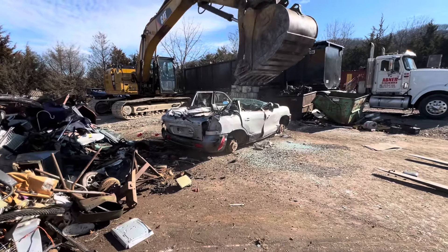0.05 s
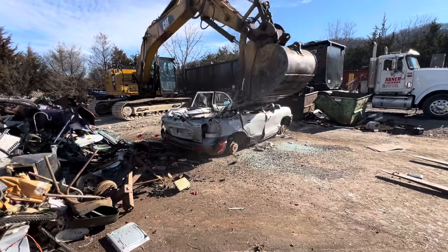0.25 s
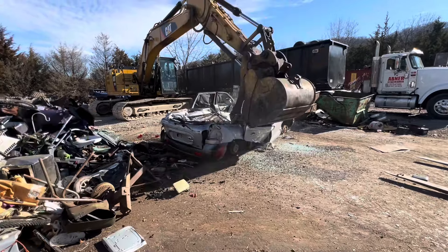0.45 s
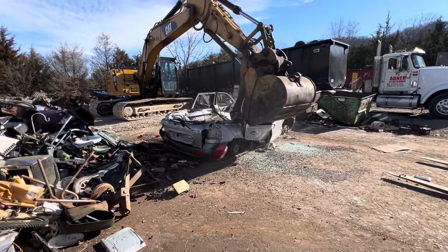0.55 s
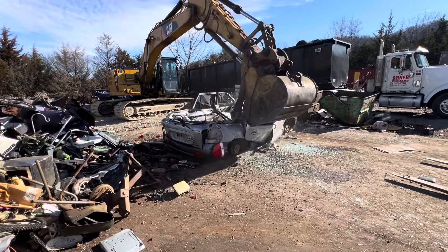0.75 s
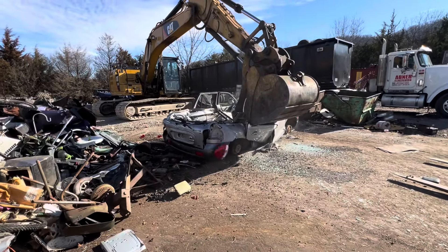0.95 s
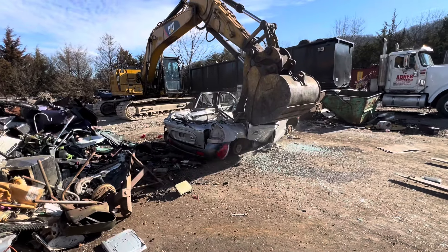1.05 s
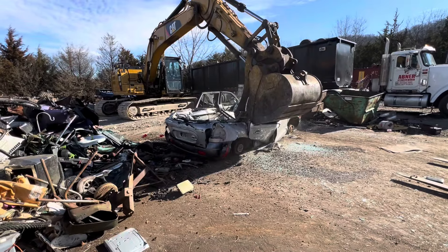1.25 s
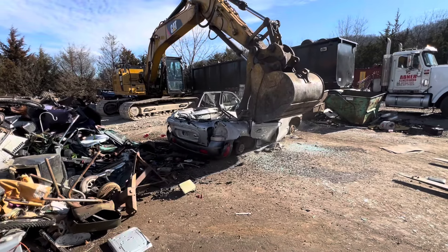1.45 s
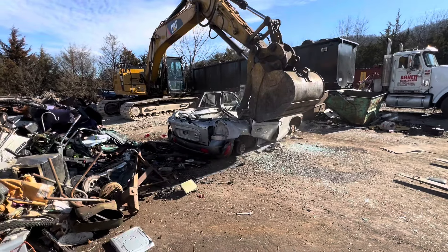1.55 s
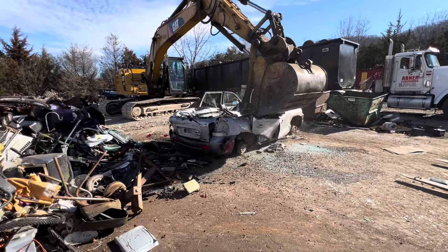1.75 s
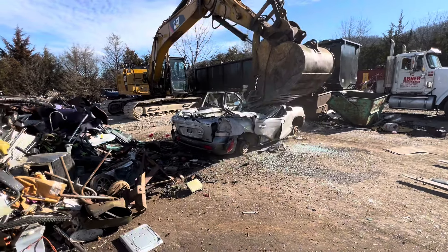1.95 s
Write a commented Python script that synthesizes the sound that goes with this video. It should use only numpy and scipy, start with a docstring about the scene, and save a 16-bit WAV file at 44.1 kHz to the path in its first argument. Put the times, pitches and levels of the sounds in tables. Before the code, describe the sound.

A car crunching under an excavator bucket, with clanks and shattering glass over diesel rumble.

```python
"""Excavator flattening a car

A bucket slams onto a wreck in a scrapyard and presses it flat. Sheet steel buckles in a storm of small
snaps, the shell booms, glass shatters and a strained panel squeals; then single clanks and a last thump
as the load shifts. The diesel and its hydraulic pump run throughout."""
import sys
import numpy as np
from scipy import signal
from scipy.fft import rfft, irfft
from scipy.io import wavfile
from scipy.ndimage import uniform_filter1d

SR = 44100
rng = np.random.default_rng(int(sys.argv[2]) if len(sys.argv) > 2 else 0)


def master_out(mix):
    """Clip the mix to full scale and print it as 16-bit PCM to the path in sys.argv[1]."""
    frames = np.transpose(np.atleast_2d(mix))
    ceiling = np.clip(frames, -1, 1)
    pcm = np.round(ceiling * 32767).astype(np.int16)
    wavfile.write(sys.argv[1], SR, pcm)


N = 88200
T = np.arange(N) / SR


def undb(db):
    """Decibels to gain."""
    return 10 ** (np.asarray(db) / 20)


def unit(x):
    """Scale to rms 1."""
    return x / np.sqrt(np.mean(x ** 2))


def curve(rows, lag_s=0):
    """Automation: straight lines through (time, value) rows."""
    return np.interp(T - lag_s, *np.array(rows).T)


def on_bins(hz, values):
    """Straight lines on a log-frequency axis, for every bin of a padded spectrum."""
    return np.interp(np.log(np.arange(N + 1) * SR / (2 * N) + 1), np.log(hz), values)


def colour(x, eq):
    """Minimum-phase EQ through (Hz, dB) rows."""
    cepstrum = irfft(on_bins(*np.array(eq).T) * np.log(10) / 20)
    cepstrum[1:N] *= 2
    cepstrum[N + 1:] = 0
    return irfft(rfft(x, 2 * N) * np.exp(rfft(cepstrum)))[:N]


def wander(rate_hz):
    """Smooth random modulation at rms 1."""
    hold = int(SR / rate_hz)
    steps = np.repeat(rng.standard_normal(N // hold + 1), hold)
    return unit(uniform_filter1d(uniform_filter1d(steps, hold), hold)[:N])


def strike(start, attack_s, t60_s):
    """Envelope with a quick rise and an exponential fall."""
    age = np.maximum(T - start, 0)
    return (1 - np.exp(-age / attack_s)) * np.exp(-np.minimum(np.log(1000) * age / t60_s, 20))


def ring(modes):
    """One second of fading partials."""
    t = T[:N // 2]
    return sum(undb(db - 60 * t / t60) * np.sin(2 * np.pi * hz * t) for hz, db, t60 in modes)


def clicks(per_s, spread_db):
    """Random clicks, many small and a few large."""
    size = undb(spread_db * np.minimum(rng.exponential(size=N), 5))
    return unit((rng.random(N) < per_s / SR) * size * rng.choice([-1, 1], N))


# Steel-on-steel hits: t/s, clank level/dB, crack level/dB, splinter level/dB
HITS = [(0.212, -51, -20, -28), (.217, -13, -9, -16.5), (.230, -32, -8.5, -17), (.292, -38, -17, -37),
        (.305, -14.5, -41, -43), (.333, -7.5, -36, -35), (.359, -16.5, -7, -31), (.399, -27, -13, -29),
        (.412, -11, -12.5, -30), (.796, -23, -17.5, -20), (.812, -23, -17, -41), (.839, -16, -12.5, -21),
        (.971, -33, -36, -33), (1.039, -54, -31.5, -31), (1.127, -47, -42, -35), (1.277, -11.5, -20, -34.5),
        (1.368, -15.5, -20.5, -25), (1.414, -25.5, -19.5, -30), (1.454, -16, -27, -34),
        (1.619, -28, -43, -57), (1.701, -16.5, -29.5, -41), (1.875, -49, -36.5, -41),
        (1.911, -29, -29, -30)]
# The ring of a clank: f/Hz, level/dB, t60/s
STEEL_MODES = [(243, -12.5, 0.2), (475, -7, 0.086), (597, -0.5, 0.06), (684, -6.5, 0.055),
               (879.6, -10, 0.08), (1134, -25, 0.083), (1314, -22, 0.12)]


def clanks():
    """Each hit rings the steel with its own tuning and balance of modes."""
    detune, scatter_db = 0.018, 2.5
    out = np.zeros(N)
    for start, clank_db, _, _ in HITS:
        pitch_draws, level_draws = rng.standard_normal((2, len(STEEL_MODES)))
        modes = [(hz * (1 + detune * pitch), db + scatter_db * level, t60)
                 for (hz, db, t60), pitch, level in zip(STEEL_MODES, pitch_draws, level_draws)]
        out += undb(clank_db) * np.interp(T - start, T[:N // 2], ring(modes), left=0, right=0)
    return out


# Midrange bite of cracking sheet: f/Hz, level/dB
CRACK_EQ = [(300, 3), (700, 0), (1500, -1.5), (3000, -4.5), (4500, -15), (8000, -36.5), (16000, -49.5)]
# Sparkle of splinters and glass: f/Hz, level/dB
SHARD_EQ = [(900, -33), (2000, 0), (3300, -0.5), (5000, -4), (8300, -3.5), (10000, -18.5), (12500, -13.5),
            (15500, -18.5)]


def cracks():
    """Each hit cracks the sheet and throws splinters of glass and plastic."""
    crack = unit(colour(clicks(per_s=14000, spread_db=2.5), CRACK_EQ))
    splinters = unit(colour(clicks(per_s=14000, spread_db=2.5), SHARD_EQ))
    attack_s = 0.00091
    out = np.zeros(N)
    for start, _, crack_db, splinter_db in HITS:
        out += undb(crack_db) * crack * strike(start, attack_s, t60_s=0.069)
        out += undb(splinter_db) * splinters * strike(start, attack_s, t60_s=0.045)
    return out


# Low-end punches of the flexing shell: t/s, start f/Hz, end f/Hz, t60/s, level/dB
SHELL_THUMPS = [(.217, 200, 89, 0.07, -0.5), (0.344, 79, 47, .3, -13), (0.403, 93, 45, 0.23, -9),
                (1.189, 197, 119, 0.043, -9.5), (1.703, 126, 50.7, .19, -12)]


def thumps():
    """The shell gives way with a low note that falls."""
    glide_s = 0.034
    out = np.zeros(N)
    for start, start_hz, end_hz, t60, db in SHELL_THUMPS:
        glide = np.exp(-np.maximum(T - start, 0) / glide_s)
        hz = (T > start) * (end_hz + (start_hz - end_hz) * glide)
        envelope = strike(start, attack_s=0.003, t60_s=t60)
        out += undb(db) * envelope * np.sin(2 * np.pi * np.cumsum(hz) / SR)
    return out


# Fader ride of the buckling steel: t/s, level/dB
CRUSH_RIDE = [(.208, -49), (.222, -26.5), (.29, -20), (.32, -11), (.37, -14.5), (.43, -16), (.48, -23.5),
              (.56, -31.5), (.67, -32), (.76, -25), (.84, -25.5), (.90, -43), (1.09, -44.5), (1.18, -36.5),
              (1.45, -39.5), (1.54, -49.5), (1.72, -32), (1.82, -56)]
# Boxy tone of the snaps: f/Hz, level/dB
SHEET_EQ = [(120, -16.5), (250, 3.5), (330, 0), (480, -2), (650, 2), (1000, -5), (1400, -10.5),
            (2800, -14.5), (4500, -24.5), (9000, -39)]
# Long rings of the panels: f/Hz, level/dB, t60/s
PANEL_RINGS = [(479, -1, 0.22), (610, -1.5, 0.34), (805, -1, 0.18), (970, 6.5, 0.26), (1240, -2, 0.15),
               (1650, 0, 0.22), (1804, -7, 0.14)]


def buckling():
    """Sheet steel folds in dense snaps, with the panels ringing 8 dB under them."""
    per_s, spread_db = 1400, 3.5
    crush = undb(curve(CRUSH_RIDE))
    snaps = unit(colour(clicks(per_s, spread_db), SHEET_EQ)) * crush
    panels = signal.fftconvolve(clicks(per_s, spread_db) * crush, ring(PANEL_RINGS))[:N]
    return snaps + undb(-8) * snaps.std() * unit(panels)


# Hollow resonances of the car's shell: f/Hz, width/Hz, level/dB
SHELL_BANDS = [(48.6, 11, -7.5), (90.4, 24.5, 2.5), (162.6, 63, -0.5), (223.3, 36, -7)]


def shell_boom():
    """The hollow shell booms, swelling just behind the buckling."""
    push = clicks(per_s=500, spread_db=1.3)
    boom = np.zeros(N)
    for hz, width, db in SHELL_BANDS:
        band = signal.butter(2, [hz - width / 2, hz + width / 2], "band", fs=SR, output="sos")
        boom += undb(db) * signal.sosfilt(band, push)
    return unit(boom) * undb(-2.5 + 0.9 * curve(CRUSH_RIDE, lag_s=0.021))


# Fader ride of breaking and falling glass: t/s, level/dB
GLASS_RIDE = [(.208, -72), (.222, -46), (.28, -32), (.36, -21), (.42, -22), (.54, -36.5), (.68, -37),
              (.73, -31), (.77, -38), (.83, -25), (.89, -42), (1.06, -50), (1.14, -40.5), (1.26, -56),
              (1.56, -56.5), (1.69, -42.5), (1.81, -67)]


def glass():
    """Windows burst into crumbs that patter down in flurries."""
    flurry_db = 2.73 * wander(69.67)
    crumbs = unit(colour(clicks(per_s=3500, spread_db=3), SHARD_EQ))
    return crumbs * undb(curve(GLASS_RIDE) + flurry_db)


# Voice of the strained panel: f/Hz, level/dB
SQUEAL_PARTIALS = [(991, -35), (1459, -34), (2030, -38.5)]


def squeal():
    """Steel slides on steel and a few rough partials sing briefly."""
    peak_s, half_length_s, rough_db, waver = 0.645, 0.081, 7.0, 0.0066
    swell = np.exp(-((T - peak_s) / half_length_s) ** 4)
    out = np.zeros(N)
    for hz, db in SQUEAL_PARTIALS:
        gain = undb(db + rough_db * wander(90.9))
        pitch_hz = hz * (1 + waver * wander(300))
        out += gain * np.sin(2 * np.pi * np.cumsum(pitch_hz) / SR)
    return swell * out


# Firing rate of the diesel, sagging under load: t/s, f/Hz
FIRING_RATE = [(0, 71.1), (.3, 71), (1.0, 69.8), (1.45, 69.12), (1.7, 69.65), (2.0, 72.34)]


def firing_phase():
    """The diesel fires a little unevenly; one turn of phase is one firing."""
    hz = curve(FIRING_RATE) * (1 + 0.0031 * wander(20))
    return 2 * np.pi * np.cumsum(hz) / SR


# Engine and pump tones: multiple of the firing rate, level/dB
DRONE_ORDERS = [(1, -54), (2, -44), (3, -46.5), (4, -47.5), (6, -52.5), (7.5, -51), (9.33, -52)]


def engine_drone(phase):
    """Firing note of the diesel and whine of its pump, each partial wavering in level."""
    return sum(np.sqrt(2) * undb(db + 2.3 * wander(14)) * np.sin(k * phase + 2 * np.pi * rng.random())
               for k, db in DRONE_ORDERS)


# Dark bed of the diesel: f/Hz, level/dB
RUMBLE_EQ = [(20, -32), (40, -16.5), (80, 3), (180, -3.5), (300, -11.5), (600, -13.5), (1100, -17),
             (1500, -25), (3000, -30.5), (8000, -38), (16000, -60.5)]


def engine_rumble(phase):
    """The diesel throbs with each firing and grows slightly as it takes the load."""
    idle_db, load_db, load_rise_s, throb = -38, 1, 0.292, 0.42
    rumble = unit(colour(rng.standard_normal(N) * (1 + throb * np.cos(phase)), RUMBLE_EQ))
    first_hit_s = HITS[0][0]
    load = np.clip((T - first_hit_s) / load_rise_s, 0, 1)
    return rumble * undb(idle_db + load_db * load)


# Airy tone of the hydraulic oil: f/Hz, level/dB
OIL_EQ = [(1000, 3), (2500, -6), (4500, -1.5), (6000, -3.5), (8500, 2), (11000, -14), (16000, -23)]


def oil_hiss():
    """Oil hisses while the excavator's arm comes down, then fades away."""
    fade_middle_s, fade_s = 1.63, 0.15
    hiss = unit(colour(rng.standard_normal(N), OIL_EQ))
    return undb(-51) * hiss / (1 + np.exp((T - fade_middle_s) / fade_s))


# Stereo image: f/Hz, left minus right/dB, left phase lead/rad, scattered over shared clatter/dB
STEREO_IMAGE = [(102, 1, -0.11, -23), (300, -1.5, -0.4, -9.5), (555, -7, 0.62, -2.5),
                (950, 6.5, 1.74, -1.5), (1560, 2.5, -1.42, 3.5), (2560, 1, 1.25, 0), (4930, 5, 1.1, 3.5),
                (7800, -1, 0.24, 13), (13100, -0.5, 0.23, 5.5)]


def yard(tones, clatter, scattered):
    """Each side gets its own colour, delay, scattered clatter and faint tail off the scrap heaps."""
    hz, balance_db, lead, scatter_db = np.array(STEREO_IMAGE).T
    share = undb(on_bins(hz, scatter_db))
    tail_db = -18
    channels = []
    for side, own in zip((1, -1), scattered):
        blend = (rfft(clatter, 2 * N) + share * rfft(own, 2 * N)) / np.sqrt(1 + share ** 2)
        spectrum = rfft(tones, 2 * N) + blend
        tail = unit(rng.standard_normal(N) * strike(0.014, attack_s=0.0094, t60_s=0.36))
        direct = np.exp(0.5j * side * on_bins(hz, lead))
        reflected = undb(tail_db) * rfft(tail, 2 * N) / np.sqrt(N)
        pan = undb(side * on_bins(hz, balance_db) / 2)
        channels.append(irfft(spectrum * (direct + reflected) * pan)[:N])
    return np.array(channels)


def scene():
    """The car gives way under the bucket in the open yard."""
    phase = firing_phase()
    tones = clanks() + thumps() + squeal() + engine_drone(phase)
    # Three independent noise layers give width: one shared, one for each side.
    shared, left, right = (
        cracks() + buckling() + shell_boom() + glass() + engine_rumble(phase) + oil_hiss()
        for _ in range(3))
    return yard(tones, shared, (left, right))


def record(dry):
    """Soft saturation rounds the loudest peaks and a steep low-pass cuts the top."""
    top_hz = 15900
    lowpass = signal.ellip(8, 0.2, 80, top_hz, fs=SR, output="sos")
    return signal.sosfilt(lowpass, np.tanh(dry))


dry = scene()
out = record(dry)
master_out(out)
```